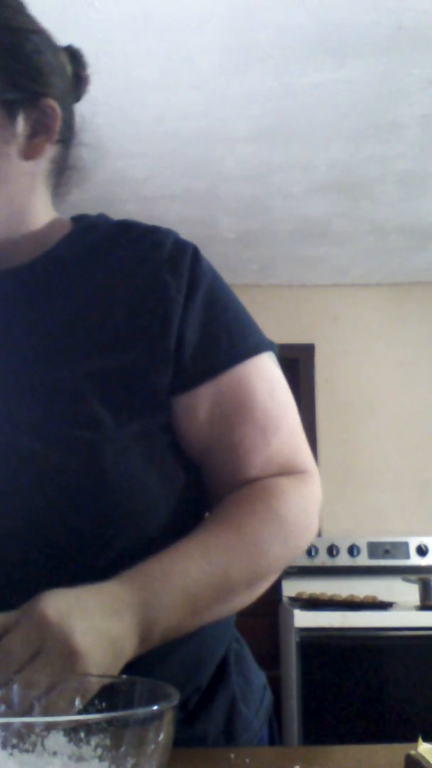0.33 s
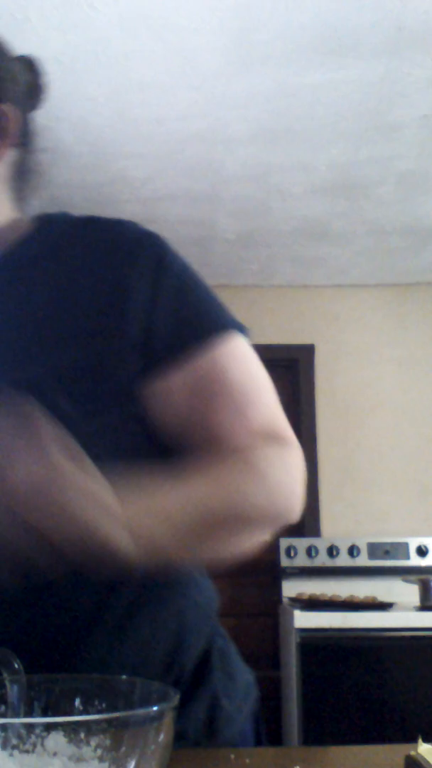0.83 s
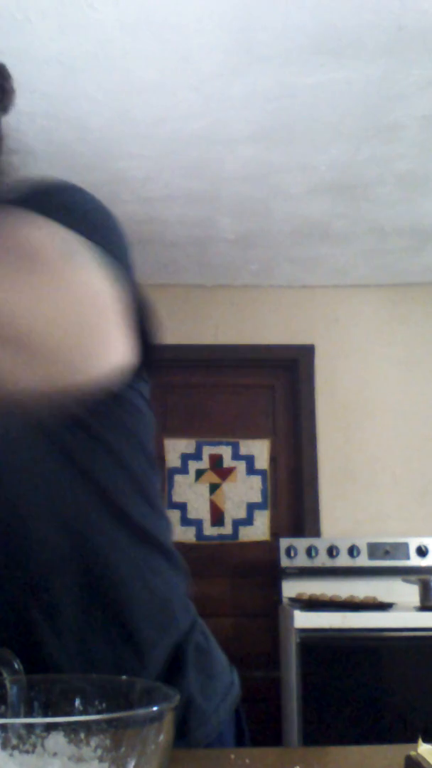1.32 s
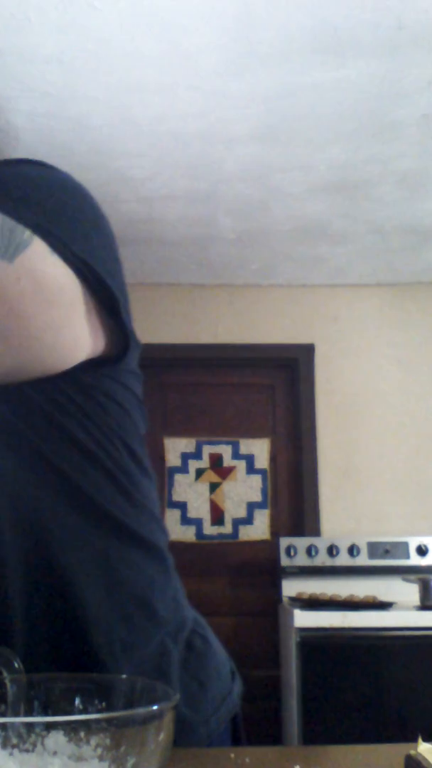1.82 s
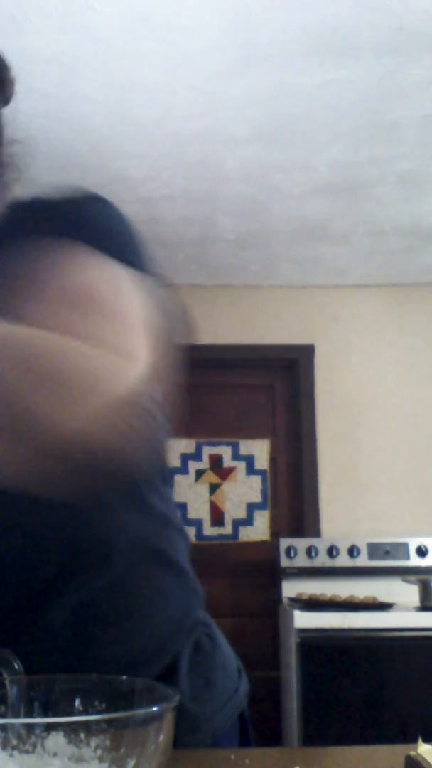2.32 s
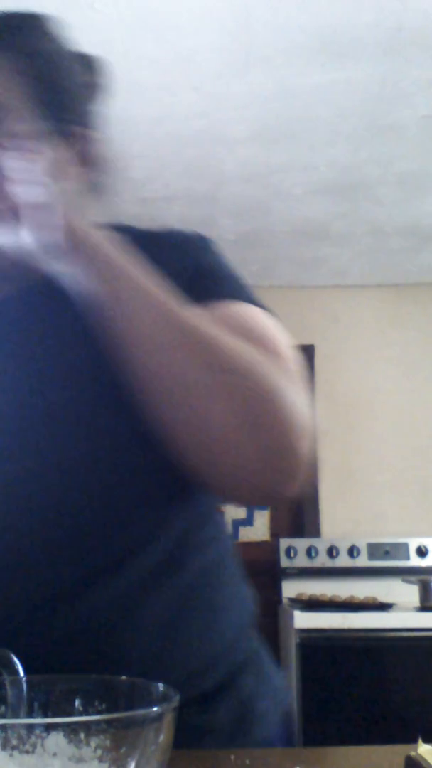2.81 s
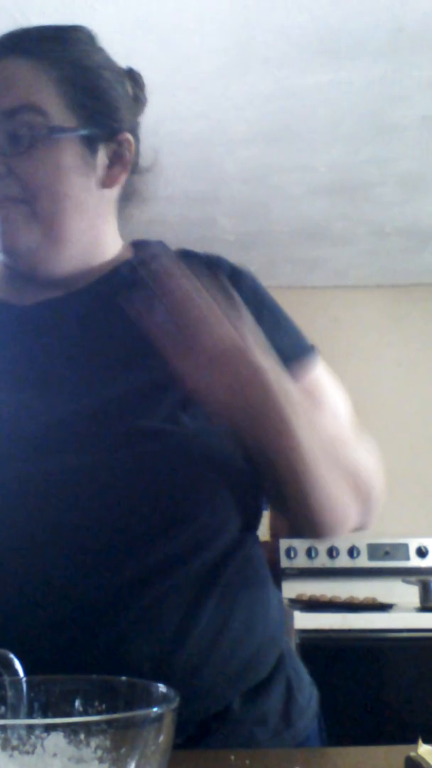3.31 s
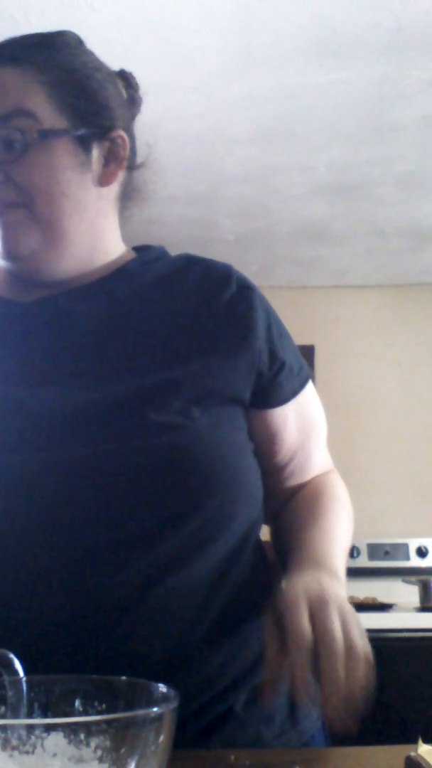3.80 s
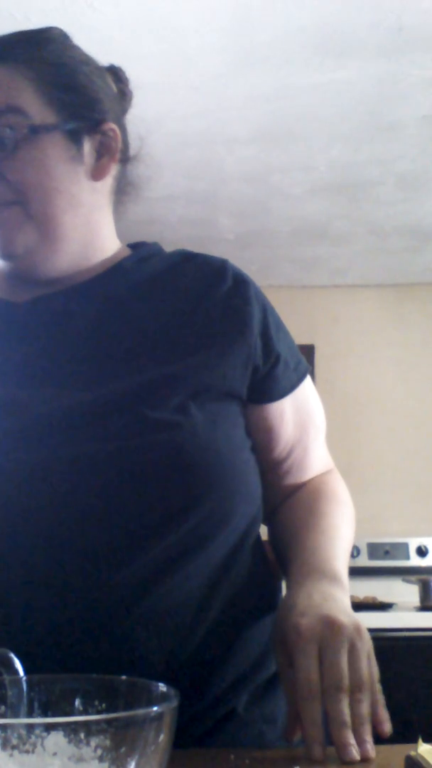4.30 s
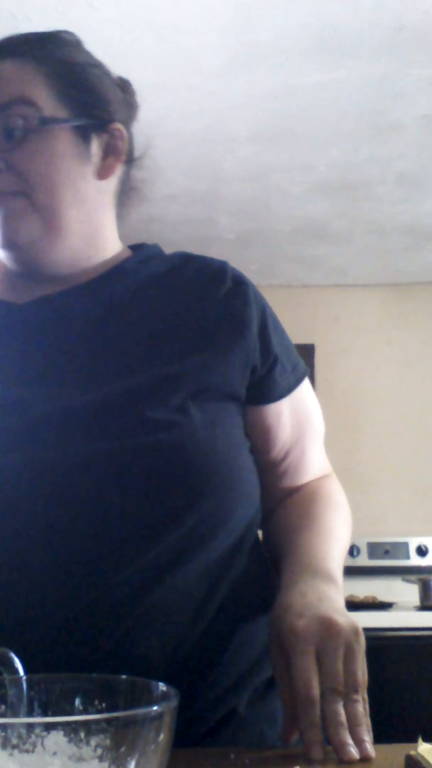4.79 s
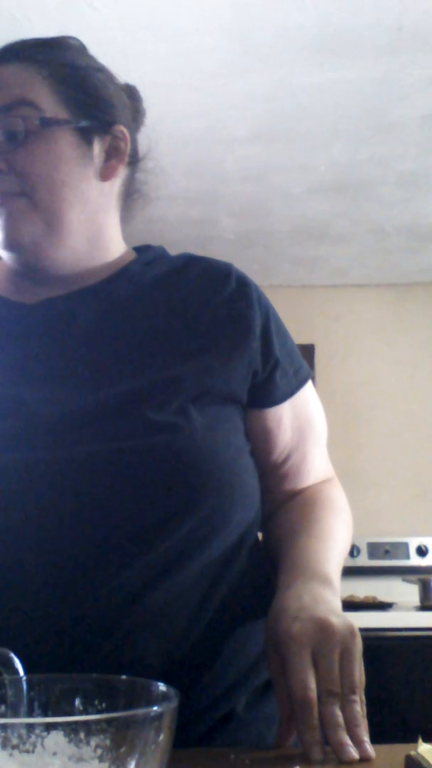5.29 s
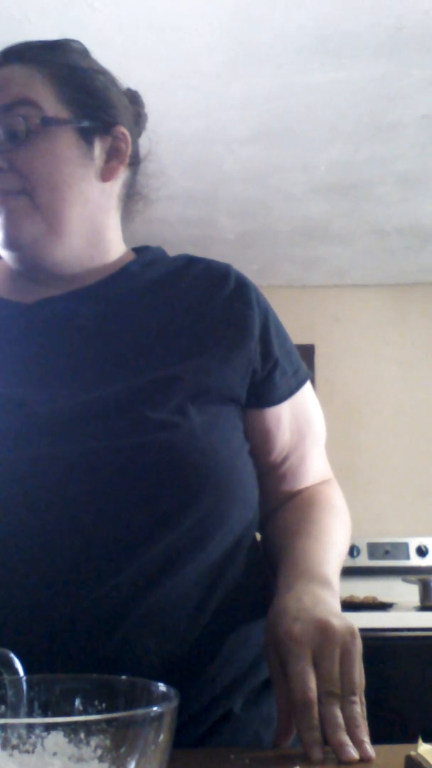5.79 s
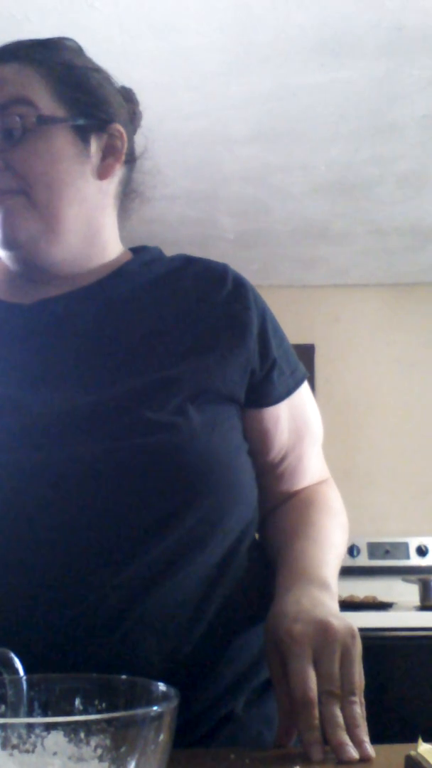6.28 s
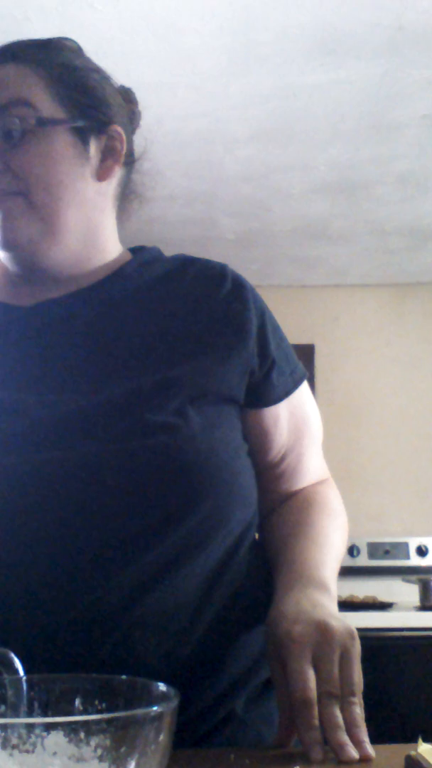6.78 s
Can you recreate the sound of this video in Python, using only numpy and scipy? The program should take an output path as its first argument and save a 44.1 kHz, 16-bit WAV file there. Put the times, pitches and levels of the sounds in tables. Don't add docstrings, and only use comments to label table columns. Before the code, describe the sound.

In a small kitchen a blender lands on the counter with a heavy double thud and a small rock back. Soft hand brushes, a lid clack, a latch click and a low press follow in near silence. A button clicks, then a very loud short pulse rattles hard nuts in the jar; a pause, another click, and a longer pulse ends the scene. Close small mono microphone, gated and limited.

```python
import sys
import numpy as np
from scipy import signal
from scipy.fft import rfft, irfft, next_fast_len
from scipy.io import wavfile
from scipy.ndimage import uniform_filter1d, minimum_filter1d, map_coordinates

SR = 44100
rng = np.random.default_rng(int(sys.argv[2]) if len(sys.argv) > 2 else 0)


def pcm_store(signal):
    levels = np.round(np.clip(np.atleast_2d(signal), -1, 1) * 32767)
    wavfile.write(sys.argv[1], SR, levels.astype(np.int16).T)


def gain_from_decibels(decibels):
    exponent = np.asarray(decibels, float) / 20
    return 10 ** exponent


N = 310905

# (frequency [Hz], density [dB per Hz])
AIR_COLOUR = [(18, -42), (55, -5.5), (100, -11.5), (160, -10.5), (236, -2), (290, -17.5), (410, -13),
              (600, -22), (1800, -31.5), (3700, -35), (5500, -41.5), (7100, -30), (9000, -36.5),
              (15500, -49)]
# (frequency [Hz], level [dB])
FRIDGE_LINES = [(59.2, -88.5), (188.4, -82), (236.9, -86)]
# (time [s], level [dB])
GATE_LEVEL = [
    (0, -57),
    (.3, -61),
    (.55, -81),
    (3.57, -84.5),
    (3.6, -60),
    (4.9, -54.5),
    (5.15, -63),
    (5.35, -68.5),
]
# (first tick [s], peak [dB], change per tick [dB])
GATE_TICKS = [
    (0.0144, -61, 2.5),
    (4.9292, -53, -4),
]
TICK_SPACING_S = 0.1024
# (frequency [Hz], t60 [s])
KITCHEN_DECAY = [(100, .4), (1000, .3), (4000, .25), (12000, 0.19)]

# (time [s], peak [dB], t60 [s]).
# Each colour is a broad spectrum (frequency [Hz], density [dB per Hz]),
# then resonances (frequency [Hz], width [Hz], level [dB]).
LANDING = [
    (0, -10, 0.13),
    (0.017, -14.5, .2),
]
COUNTER_COLOUR = [
    [(15, -40.5), (25, -12.5), (101, -1), (237, -6.5), (306, 0), (463, -14), (631, -11.5), (700, -13), (979, -19.5), (12000, -84.5), (15600, -103), (22000, -120)],
    [(293.5, 27, -3), (587, 55, -10), (744, 23, -11)],
]
SHELF_RATTLE = [
    (0.0046, -45.5, 0.72),
]
SHELF_COLOUR = [
    [(500, -30.5), (1200, 1), (4800, -7), (5600, -26), (9000, -31)],
    [(3550, 400, 0.0039)],
]
ROCK_BACK = [
    (.157, -19, 0.073),
]
ROCK_COLOUR = [
    [(30, -21.5), (150, -6), (400, -16), (800, -23.5), (1400, -45.5), (3000, -70)],
    [(278, 53, 0.0032)],
]
# (time [s], level [dB])
BRUSH = [
    (0.0, -68),
    (0.008, -81),
    (0.17, -69.5),
    (0.19, -56),
    (0.2, -67),
    (0.29, -73.5),
    (0.322, -73.5),
    (0.42, -92),
]
# (time [s], peak [dB], t60 [s], frequency [Hz])
HAND_BUMPS = [
    (0.414, -53.5, 0.04, 110.9),
    (0.441, -50.5, 0.043, 231.3),
    (0.598, -58, 0.045, 218),
    (0.656, -53.5, 0.039, 220),
    (1.029, -44.5, 0.049, 217),
]
LID_TOUCHES = [
    (0.6564, -61.5, 0.052),
    (1.0196, -39, 0.05),
    (1.0344, -40.5, 0.061),
]
LID_COLOUR = [
    [(530, -59.5), (900, -31), (1420, -21.5), (2110, -1.5), (2650, -12), (2890, -28), (7000, -31.5), (9100, -55.5), (15400, -120)],
    [(2120, 200, 2)],
]
LATCH_CLICK = [
    (1.603, -38.5, 0.069),
]
LATCH_COLOUR = [
    [(180, -35.5), (300, -13.5), (802, -32), (1080, -12.5), (1400, -22), (2080, -4.5), (2960, -22), (3430, -22), (5240, -25.5), (10000, -30.5), (13000, -57.5), (22000, -120)],
    [(2100, 220, 7), (3460, 250, -9.5), (4366, 300, -13.5)],
]
PALM_PATS = [
    (1.719, -58.5, 0.046),
    (1.753, -40, 0.03),
    (1.784, -64.5, 0.04),
    (1.804, -77, 0.04),
]
PALM_COLOUR = [
    [(15, -48.5), (25, -30), (151, 13), (295, -37.5), (838, -51), (1060, -38), (1500, -49), (1950, -78), (3300, -120)],
    [(139, 47, 1.5)],
]
RIM_SNAP = [
    (1.9545, -35, 0.044),
]
RIM_COLOUR = [
    [(200, -40.5), (900, -18.5), (5000, -27.5), (12000, -43)],
    [(850, 160, 3.5), (1580, 150, -0.5), (3560, 500, -14.5)],
]
LID_SEATS = [
    (1.958, -27.5, 0.16),
    (1.98, -28, 0.13),
    (2.005, -33, 0.21),
]
SEAT_COLOUR = [
    [(15, -35.5), (25, -12), (60, 0), (109, -12), (152, -6), (276, -23.5), (306, -23.5), (418, -30), (615, -22.5), (1110, -27.5), (7350, -49), (12000, -63), (15600, -94.5), (22000, -120)],
    [(149, 66, -7), (890, 120, -28)],
]
BUTTON_PUSH = [
    (3.374, -44.5, 0.07),
    (5.158, -30, 0.049),
]
PANEL_COLOUR = [
    [(120, -38), (200, -9.5), (625, -4.5), (752, -8.5), (1070, -3.5), (1570, -11), (2300, -27), (3460, -25), (5350, -42), (6330, -27), (11000, -39), (14300, -77.5), (22000, -120)],
    [(600, 180, -0.5), (1150, 210, 1), (1630, 71, 4), (3430, 370, -11.5)],
]
# (time [s], peak [dB], frequency [Hz], tick re peak [dB])
RELAY_SWINGS = [
    (3.469, -47, 865, -10.5),
    (5.253, -35, 864, -13),
]

# (on [s], blades run free [s], coasting [s], stop [s], time to bite [s])
PRESSES = [
    (3.566, 3.735, 4.5, 4.86, .008),
    (5.352, 5.625, 6.7, 7.06, 0.015),
]
BLADE_RING_DB = [-29.5, -31.5, -15.5, -18, -32]
RING_RISE_S = .06
# (frequency [Hz], density [dB per Hz])
SPRAY_COLOUR = [(2940, -29.5), (5000, 2.5), (5490, -5.5), (6780, 1), (8180, -2.5), (10100, -16),
                (12800, -21.5), (15300, -33)]
# (time [s], peak [dB], frequency [Hz], crack re peak [dB])
NUT_STRIKES = [(3.578, -7.5, 1230, -16), (3.605, 2.5, 1563, -5.5), (3.737, 9, 2240, -19),
               (3.773, 1, 2300, -10), (3.875, 8, 2240, -15), (3.932, 4, 1107, -20.5),
               (3.997, 7.5, 2300, -10.5), (4.056, 3.5, 1290, -9.5), (4.163, 12, 1150, -19.5),
               (4.278, -4, 1290, -18.5), (4.474, 0.5, 1150, -17.5), (4.532, -3.5, 1210, -13.5),
               (4.576, -2, 1262, -17), (4.678, 3.5, 1520, -28.5), (4.754, 0, 1207, -25.5),
               (5.875, 1.5, 987, -14), (5.925, 3.5, 2240, -17.5), (5.969, 1, 2199, -14),
               (6.148, -3, 2238, -18.5), (6.212, -7.5, 2020, -13.5), (6.252, 6, 1053, -19),
               (6.294, -2, 2336, -18.5), (6.397, 8, 2205, -17), (6.513, 1, 1996, -13),
               (6.845, 5.5, 681, -19.5), (6.618, 4, 2298, -8), (6.74, 4, 700, -17),
               (6.828, -0.5, 1210, -11), (6.974, 3, 950, -19.5), (7.016, 2.5, 1506, -16.5)]
# (frequency [Hz], width [Hz], level [dB])
JAR_MODES = [(680, 31, -7.5), (1210, 260, -22.5), (2020, 50, 1), (2240, 40, -13.5), (3005, 180, -13.0),
             (3790, 90, -12.5), (4767, 62, -12), (5940, 110, -16.5), (6710, 45, -19.0), (7350, 17, -17.0),
             (8076, 38, -19.5), (12400, 110, -43), (12620, 42, -34.5), (1085, 60, -1.0), (1290, 40, -17),
             (1940, 30, 2.0), (2343, 6.7, 5), (620, 40, -8), (307.0, 37, 4.0), (173, 65, -14),
             (55, 25, -18.5)]
# (frequency [Hz], density [dB per Hz])
CHURN_COLOUR = [(18, -53.5), (30, -36.5), (212, -17), (306, -6.5), (408, -10), (619, -2), (783, -5),
                (1190, -1), (1760, -3), (2280, -7), (2530, -9.5), (3750, -9.5), (5260, -25.5),
                (8200, -19.5), (15300, -63)]
# (time [s], rattle [dB], froth re rattle [dB])
TUMBLE = [
    [(3.6, -12.5, -21), (3.63, -13.5, -21), (3.782, -12.5, -13), (3.928, -11, -17.5), (4.588, -13.5, -17),
     (4.606, -10, -28.5), (4.666, -21, -16), (4.68, -10.5, -26), (4.86, -19, -22)],
    [(5.385, -10, -24), (5.575, -12.5, -10.5), (6.241, -14, -15.5), (6.681, -12, -15.5),
     (6.691, -17.5, -13.5), (6.863, -10, -21), (6.919, -16, -19.5), (7.039, -16.5, -20), (7.05, -11, -29)],
]
CATCH_S, CATCH_DB = 0.0094, -27
RUN_DOWN_DB_PER_S = -290
FROTH_DB = -19
# (drop [s], hush [dB], hush length [s])
HUSHES = [
    (3.997, -7.5, .03),
    (4.093, 1, .06),
    (4.678, -11.5, .06),
    (6.972, -4, .08),
    (7.012, -12, .025),
]
FROTH_HANGS = .65
SURGE_SHARE, SURGE_S = .45, .03
# (time [s], base drumming [dB], counter rumble [dB], length [s])
FOOT_LURCHES = [(3.6, -29.5, -16, .05), (3.662, -12, -28, .03), (3.77, -23, -36, .1),
                (4.14, -15, -21.5, 0.058), (4.5, -26, -34, 0.061), (4.72, -22, -29, 0.039),
                (4.873, -15, -23, 0.022), (5.43, -15.5, -20, 0.054), (5.57, -12, -41.5, 0.032),
                (5.816, -16.5, -46.5, 0.067), (6.1, -21, -41, .12), (6.39, -16.5, -33, .04),
                (6.62, -35.5, -32.5, .04), (6.87, -24, -26.5, .06)]
# (top [s], drag length [s], top speed [Hz], level [dB])
SHAFT_DRAGS = [
    (3.643, .36, 187.6, -17),
    (5.569, .74, 234.8, -13),
]
SAG_HZ_PER_S, SAG_EASES_S = 196, .9
SHAFT_ORDERS = list(zip([1, 2, 4], [-4, 0, -12]))
# (frequency [Hz], width [Hz], level [dB])
BASE_MODES = [(308.1, 95, -1), (213, 37, -7.5)]
BASE_LEAK_DB, FLUTTER_DB = -22, 1.6
# (time [s], length [s], frequency [Hz], level [dB])
START_STRAIN = (5.39, .13, 125, -27)


def unit(x):
    return x / np.sqrt(np.mean(x ** 2) + 1e-20)


def along(points, hz):
    f, v = np.transpose(points)
    return np.interp(np.log(hz + 1), np.log(f + 1), v)


def wobble(rate):
    knots = rng.standard_normal(int(N * rate / SR) + 4)
    return map_coordinates(knots, [np.arange(N) * rate / SR])


def filtered(x, response):
    m = next_fast_len(N + SR // 2)
    return irfft(rfft(x, m) * response(np.fft.rfftfreq(m, 1 / SR)), m)[:N]


def modes(table):
    def response(f):
        total = 0
        for k, (centre, width, db) in enumerate(table):
            damping = 1j * f * width
            total = total + (-1) ** k * gain_from_decibels(db) * damping / (centre * centre - f * f + damping)
        return total
    return response


def causal(gain):
    c = irfft(np.log(gain + 1e-6))
    c[1:len(c) // 2] *= 2
    c[len(c) // 2 + 1:] = 0
    return np.exp(rfft(c))


def body(spectrum, table, broad_db):
    def response(f):
        ring = sum(np.abs(modes([(c, w, db * 2 / 3)])(f)) ** 3 for c, w, db in table)
        broad = gain_from_decibels(2 * (along(spectrum, f) + broad_db))
        return causal(np.sqrt(ring + broad))
    return response


def add(track, s, sound):
    part = track[round(s * SR):][:len(sound)]
    part += sound[:len(part)]


def knocks(contacts, tone, gain_db, rise=0.00024):
    force, t = np.zeros(N), np.arange(SR // 2) / SR
    for s, db, t60 in contacts:
        envelope = gain_from_decibels(db - 60 * t / t60) * (1 - np.exp(-t / rise))
        add(force, s, envelope * rng.standard_normal(len(t)))
    return gain_from_decibels(gain_db) * filtered(force, body(*tone, broad_db=0.5))


def room_tone():
    t = np.arange(N) / SR
    air = unit(filtered(rng.standard_normal(N), lambda f: gain_from_decibels(along(AIR_COLOUR, f))))
    lines = sum(gain_from_decibels(db + 78.0 + 1.5 * wobble(11)) * np.sin(2 * np.pi * hz * t) for hz, db in FRIDGE_LINES)
    ticks, k = np.zeros(N), np.arange(4)
    for s, db, step_db in GATE_TICKS:
        ticks[np.round((s + TICK_SPACING_S * k) * SR).astype(int)] = gain_from_decibels(db + 5.0 + step_db * k)
    gate = gain_from_decibels(np.interp(t, *np.transpose(GATE_LEVEL)))
    return gate * (air + lines) + filtered(ticks, modes([(14040, 3600, 0)]))


def set_down():
    return knocks(LANDING, COUNTER_COLOUR, gain_db=21)


def kitchen(x):
    hz, t, z = signal.stft(rng.standard_normal(SR // 2), SR, nperseg=256)
    decay = gain_from_decibels(-60 * t / along(KITCHEN_DECAY, hz)[:, None])
    tail = signal.istft(z * decay, SR, nperseg=256)[1]
    late = np.pad(x, (300, 0))
    return signal.fftconvolve(late, tail / np.linalg.norm(tail))[:N]


def slide():
    s, db = np.transpose(BRUSH)
    t = np.arange(N) / SR
    grit = gain_from_decibels(4 * wobble(330)) * rng.standard_normal(N)
    hiss = unit(filtered(grit, modes([(7110, 640, 3.5), (9200, 2500, -10.5)])))
    return gain_from_decibels(np.interp(t, s, db) + 3.5) * (t < s[-1]) * hiss


def shelf():
    return knocks(SHELF_RATTLE, SHELF_COLOUR, gain_db=8)


def rock_back():
    return knocks(ROCK_BACK, ROCK_COLOUR, gain_db=30, rise=0.0029)


def bumps():
    out, t = np.zeros(N), np.arange(SR // 5) / SR
    for s, db, t60, hz in HAND_BUMPS:
        envelope = gain_from_decibels(db + 11.5 - 60 * t / t60) * (1 - np.exp(-t / 0.01))
        add(out, s, envelope * np.sin(2 * np.pi * hz * t))
    return out


def lid():
    return knocks(LID_TOUCHES, LID_COLOUR, gain_db=5)


def latch():
    return knocks(LATCH_CLICK, LATCH_COLOUR, gain_db=10.5)


def palm():
    return knocks(PALM_PATS, PALM_COLOUR, gain_db=21.5)


def rim():
    return knocks(RIM_SNAP, RIM_COLOUR, gain_db=16.5)


def seat():
    return knocks(LID_SEATS, SEAT_COLOUR, gain_db=22.0)


def button():
    return knocks(BUTTON_PUSH, PANEL_COLOUR, gain_db=9.5, rise=.0015)


def relay():
    out, t = np.zeros(N), np.arange(SR // 40) / SR
    contact_band = signal.butter(2, [3400, 5300], "band", fs=SR)
    swing = np.interp(t, [0, .006, .017, .02], [0.0, 0.96, .25, 0.14])
    for s, db, hz, tick_db in RELAY_SWINGS:
        tick = signal.lfilter(*contact_band, rng.standard_normal(len(t)))
        add(out, s, gain_from_decibels(db) * swing * (np.sin(2 * np.pi * hz * t) + gain_from_decibels(tick_db + 5) * tick))
    return out


def press():
    t = np.arange(N) / SR
    rattle, froth = np.zeros(N), np.zeros(N)
    for (on, *_, bite), load in zip(PRESSES, TUMBLE):
        s, db, froth_db = np.transpose(load)
        started = t > on - CATCH_S
        shape = np.interp(t, [on - CATCH_S, on, on + bite, *s], [-90, CATCH_DB, db[0] - 7, *db])
        rattle += gain_from_decibels(shape + RUN_DOWN_DB_PER_S * np.maximum(t - s[-1], 0)) * started
        froth = np.where(started, np.interp(t, s, froth_db) - FROTH_DB, froth)
    swing = np.zeros(N)
    for s, db, span in HUSHES:
        hush = np.clip(1 - (s - t) / span, 0, 1)
        surge = -SURGE_SHARE * np.exp(-np.abs(t - s) / SURGE_S)
        swing += db * np.where(t < s, hush, surge)
    swing = uniform_filter1d(swing, size=SR // 350)
    return 20 * np.log10(rattle + 1e-9) + swing, froth - FROTH_HANGS * np.minimum(swing, 0)


def bursts(rate, spread_db, t60):
    starts = (rng.random(N) < rate / SR) * gain_from_decibels(spread_db * rng.standard_normal(N))
    return unit(1.3 + signal.lfilter([1], [1, -gain_from_decibels(-60 / (t60 * SR))], starts))


def jar(f):
    return body(CHURN_COLOUR, JAR_MODES, broad_db=-4)(f)


def crunch(count):
    when, pitch, size, life = rng.random((count, 4)).T
    hz = 650 * gain_from_decibels(17 * pitch)[:, None]
    t = np.arange(SR // 60) / SR
    fade = t * hz / (1.8 + 6 * life[:, None])
    strength = gain_from_decibels(-4.5 * np.log(size + .02))[:, None]
    rings = strength * np.sin(2 * np.pi * hz * t) * np.exp(-2.5 * fade)
    at = (when * N).astype(int)[:, None] + np.arange(len(t))
    push = np.bincount(at.ravel(), (rings / hz).ravel())[:N]
    return unit(np.gradient(push))


def patchy(x, patchy_db):
    z = signal.stft(x, nperseg=256)[2]
    field = uniform_filter1d(rng.standard_normal(z.shape), size=3, axis=0)
    field = uniform_filter1d(field, size=8, axis=1)
    return signal.istft(z * gain_from_decibels(patchy_db * unit(field)), nperseg=256)[1][:N]


def grinding(clump):
    hits = rng.random(N) < 1500 / SR * clump
    chips = hits * rng.standard_normal(N) * gain_from_decibels(2.15 * rng.standard_normal(N))
    slosh = clump * rng.standard_normal(N)
    shaken = unit(filtered(0.61 * unit(chips) + 0.78 * slosh, jar))
    shaken = patchy(shaken + gain_from_decibels(-9.5) * crunch(count=3500), patchy_db=2.5)

    def below(hz):
        return filtered(shaken, lambda f: 1 / (1 + (f / hz) ** 12))

    sub, low, base, mid, high = (below(hz) for hz in (48, 235, 420, 2700, 5300))
    rattle_db, froth_db = press()
    t, level = np.arange(N) / SR, gain_from_decibels(rattle_db + 2.0)
    drum, rumble = level * gain_from_decibels(-24), level * gain_from_decibels(-30)
    turning = np.minimum(1, gain_from_decibels(rattle_db + 22))
    for s, drum_db, rumble_db, span in FOOT_LURCHES:
        lurch = turning * np.exp(-np.abs(t - s) / span)
        drum += gain_from_decibels(drum_db) * lurch
        rumble += gain_from_decibels(rumble_db) * lurch
    rattle = level * (unit(mid - base) + gain_from_decibels(-9.5 + .45 * froth_db) * unit(high - mid))
    return rattle + drum * unit(base - low) + rumble * unit(low - sub)


def blades(clump):
    out, t = np.zeros(N), np.arange(N) / SR

    def driven(gain, tone):
        return unit(filtered(gain * rng.standard_normal(N), tone))

    ring = driven(clump * gain_from_decibels(1.5 * wobble(14)), modes([(2227, 67, 0.18), (2300, 20, -2.2)]))
    wall = driven(clump * gain_from_decibels(1.9 * wobble(14)), modes([(1207, 34, -0.09), (1272, 13, -0.91)]))
    handfuls = np.sqrt(clump) * bursts(rate=21, spread_db=1, t60=0.12)
    treble_modes = [mode for mode in JAR_MODES if mode[0] > 5500]
    spray = driven(handfuls * gain_from_decibels(0.91 * wobble(12)), body(SPRAY_COLOUR, treble_modes, broad_db=-18.5))
    whine = driven(1, modes([(12400, 90, -2), (12830, 50, 0)]))
    rattle_db, froth_db = press()
    for on, free, coast, stop, _ in PRESSES:
        ring_db = np.interp(t, [on, free - RING_RISE_S, free, coast, stop], BLADE_RING_DB)
        ring_db += .75 * RUN_DOWN_DB_PER_S * np.maximum(t - stop, 0)
        ring_db += 0.42 * np.clip(rattle_db + 13, -15, 5)
        out += gain_from_decibels(ring_db) * np.clip((t - on) / CATCH_S, 0, 1) * ring
    out += gain_from_decibels(0.67 * rattle_db - 12.5) * wall
    out += gain_from_decibels(rattle_db + froth_db - 18.5) * spray
    return out + gain_from_decibels(rattle_db + 1.4 * froth_db - 47) * whine


def strikes():
    blows, cracks, rings = np.zeros((3, N))
    t = np.arange(SR // 20) / SR
    for s, db, hz, crack_db in NUT_STRIKES:
        blow = gain_from_decibels(db - 60 * t / 0.046) * (1 - np.exp(-t / .0008))
        add(blows, s, blow * rng.standard_normal(len(t)))
        add(cracks, s, gain_from_decibels(db + crack_db - 60 * t / 0.012) * rng.standard_normal(len(t)))
        ring = gain_from_decibels(db - 5.5 - 60 * t / .04) * (1 - np.exp(-t / 0.0028))
        add(rings, s, ring * np.sin(2 * np.pi * hz * t))
    shell = modes([(3500, 1500, -5), (6200, 600, -9)])
    return rings + gain_from_decibels(2.0) * filtered(blows, jar) + gain_from_decibels(2.5) * filtered(cracks, shell)


def motor():
    out, t = np.zeros(N), np.arange(N) / SR

    def window(s, span):
        return np.interp(t, [s - .03, s, s + span, s + span + 0.045], [0, 1, 1, 0])

    def base(f):
        return sum(modes([mode])(f) ** 2 for mode in BASE_MODES) + gain_from_decibels(BASE_LEAK_DB)

    for s, span, top_hz, db in SHAFT_DRAGS:
        sag = SAG_HZ_PER_S * SAG_EASES_S * (1 - np.exp(-np.clip(t - s, 0, 1) / SAG_EASES_S))
        turn = 2 * np.pi * np.cumsum((top_hz - sag) * (1 + 0.005 * wobble(25))) / SR
        for k, order_db in SHAFT_ORDERS:
            out += window(s, span) * gain_from_decibels(db + order_db + FLUTTER_DB * wobble(22)) * np.sin(k * turn)
    s, span, hz, db = START_STRAIN
    strain = window(s, span) * gain_from_decibels(db + 1.5 * wobble(30)) * np.sin(2 * np.pi * hz * t)
    return filtered(out, base) + strain


def scene():
    hands = set_down() + lid() + bumps() + seat() + button()
    hands += palm() + latch()
    hands += rock_back() + rim()
    hands += shelf()
    clump = bursts(rate=38, spread_db=5, t60=0.09)
    blender = gain_from_decibels(-3.0) * grinding(clump) + strikes() + motor() + blades(clump)
    echo = kitchen(gain_from_decibels(-9.0) * hands + gain_from_decibels(-13.5) * blender + gain_from_decibels(-30) * relay())
    return (hands + blender + relay() + echo + slide() + room_tone())[None]


def band_limit(x):
    return signal.sosfilt(signal.butter(12, 15480, fs=SR, output="sos"), x)


def record(dry):
    need = np.minimum(1, .95 / (np.abs(dry) + 1e-9))
    gain = uniform_filter1d(minimum_filter1d(need, size=161), size=81)
    step = 1 / 2048
    stepped = step * np.floor(gain * dry / step - .02) + .00003
    return band_limit(stepped)


dry = scene()
out = record(dry)
pcm_store(out)
```